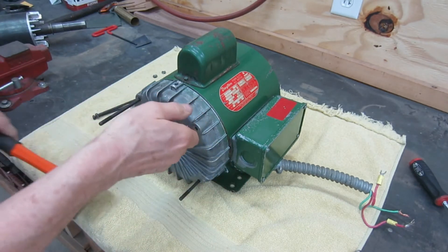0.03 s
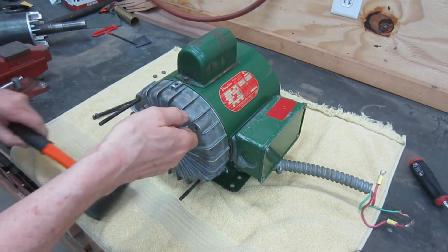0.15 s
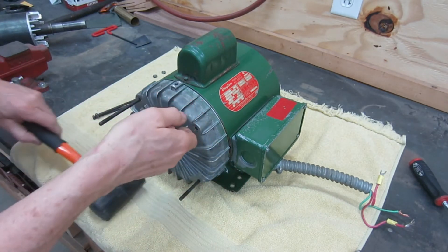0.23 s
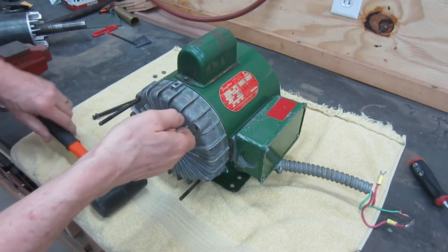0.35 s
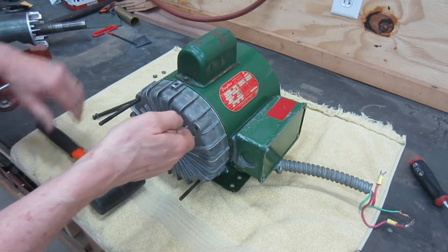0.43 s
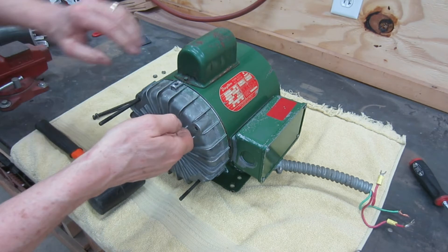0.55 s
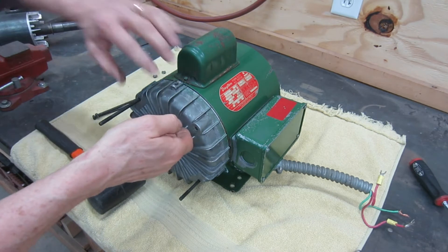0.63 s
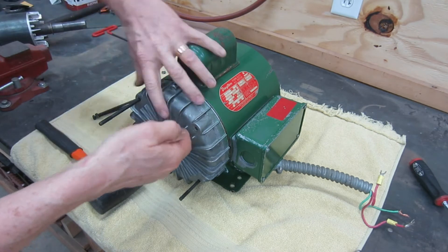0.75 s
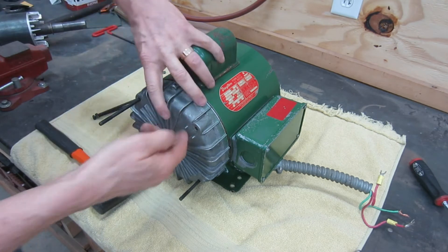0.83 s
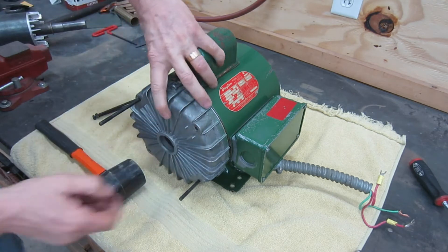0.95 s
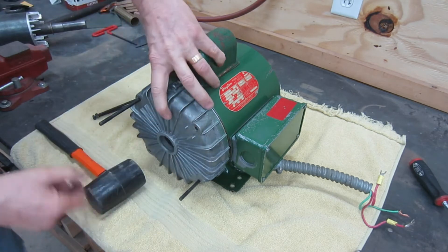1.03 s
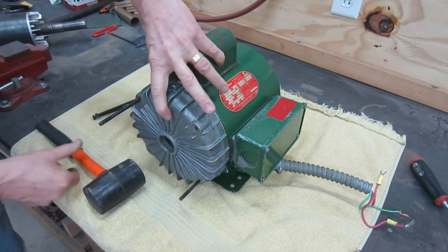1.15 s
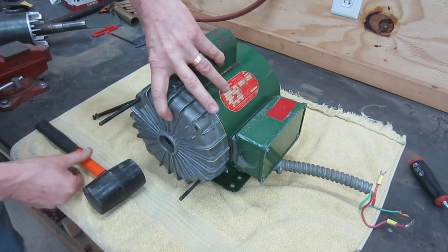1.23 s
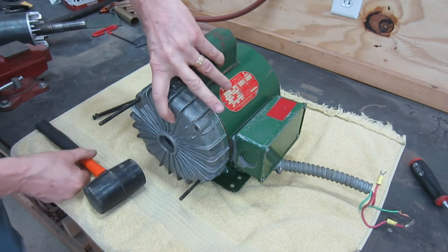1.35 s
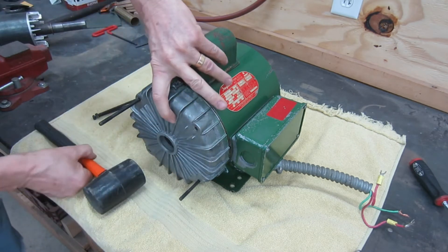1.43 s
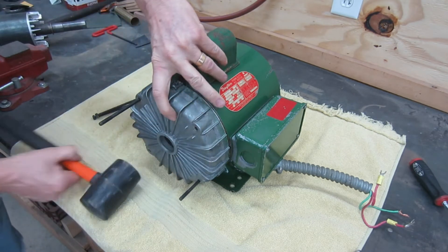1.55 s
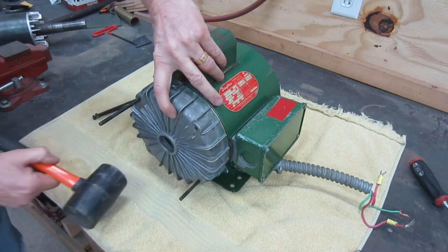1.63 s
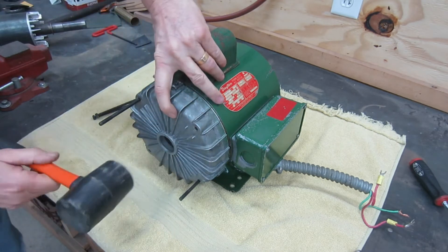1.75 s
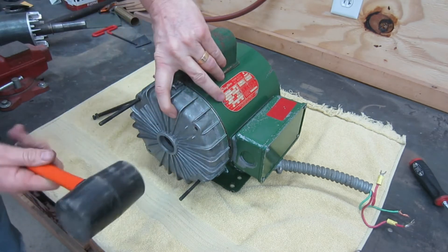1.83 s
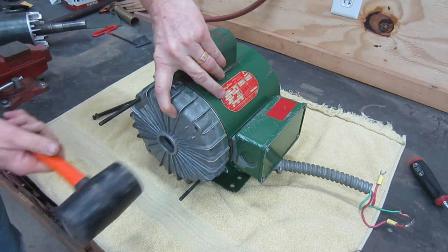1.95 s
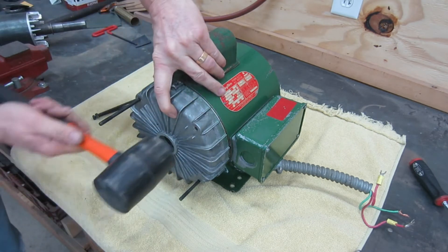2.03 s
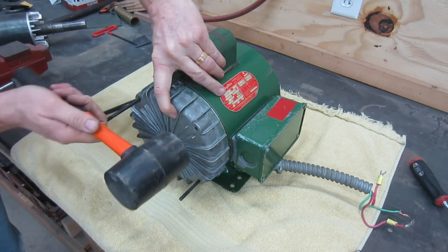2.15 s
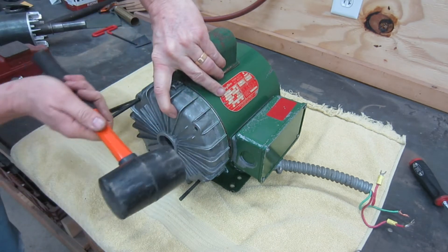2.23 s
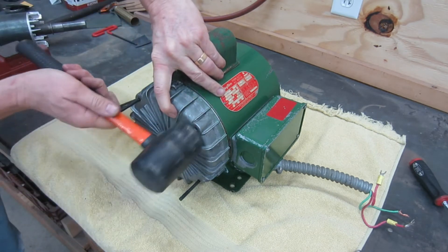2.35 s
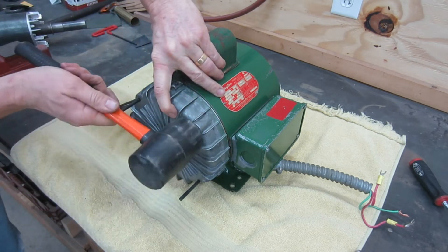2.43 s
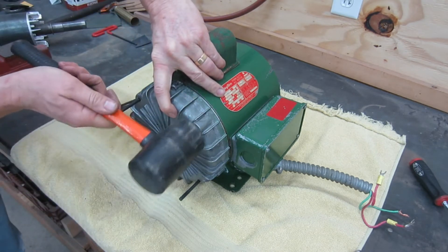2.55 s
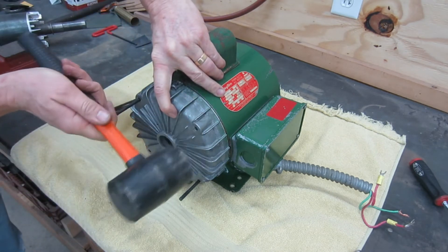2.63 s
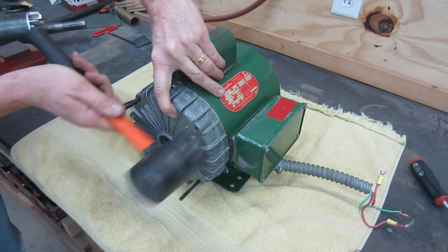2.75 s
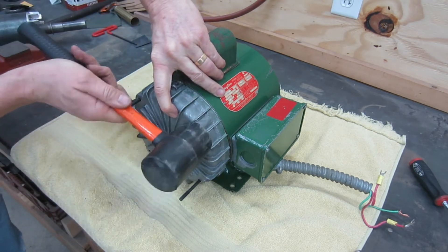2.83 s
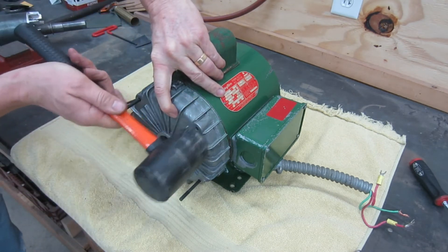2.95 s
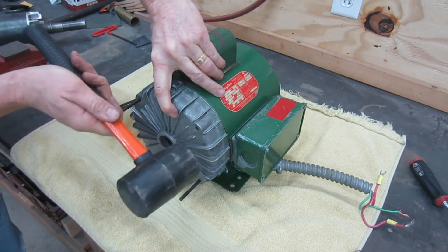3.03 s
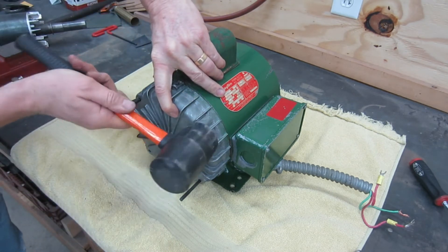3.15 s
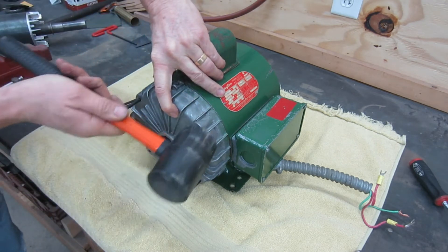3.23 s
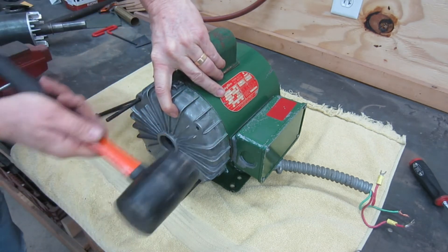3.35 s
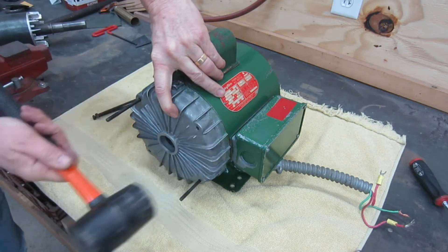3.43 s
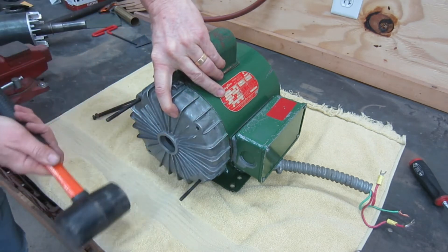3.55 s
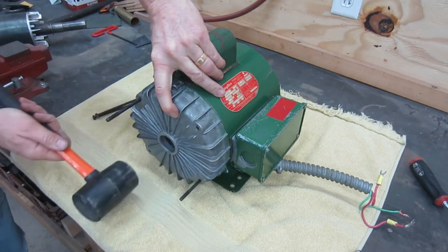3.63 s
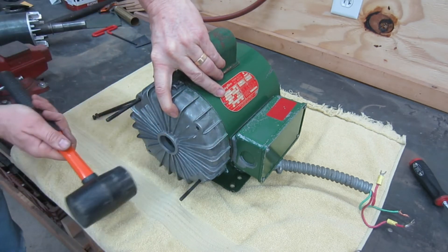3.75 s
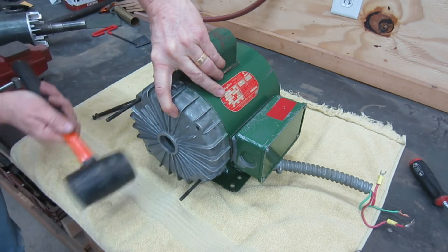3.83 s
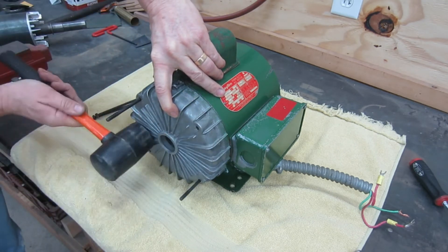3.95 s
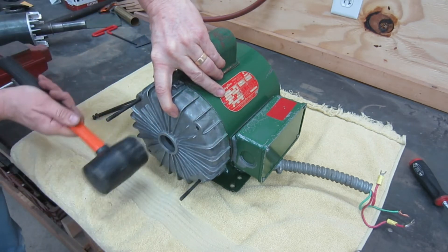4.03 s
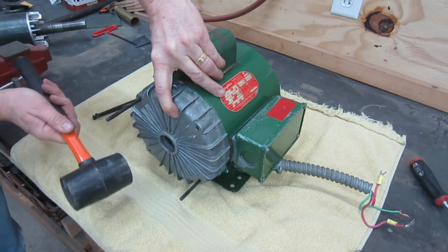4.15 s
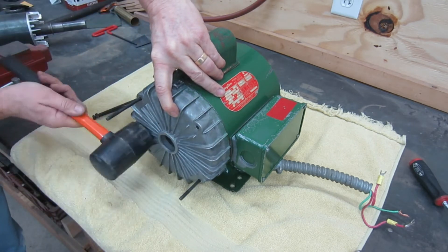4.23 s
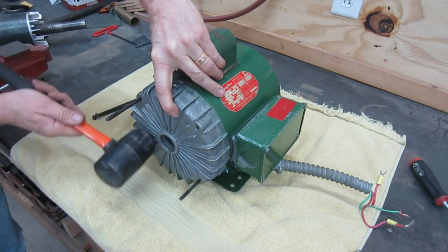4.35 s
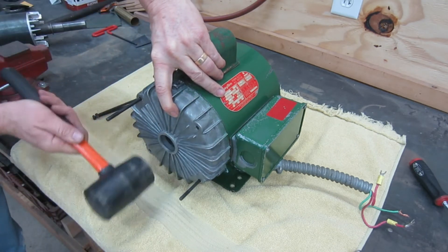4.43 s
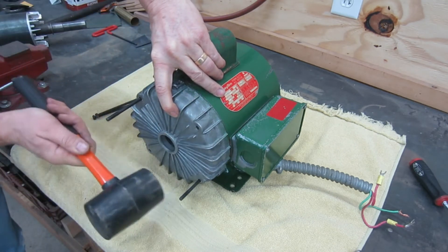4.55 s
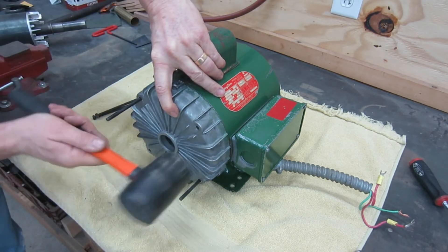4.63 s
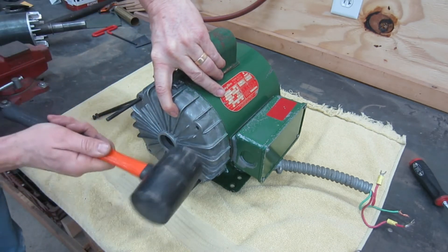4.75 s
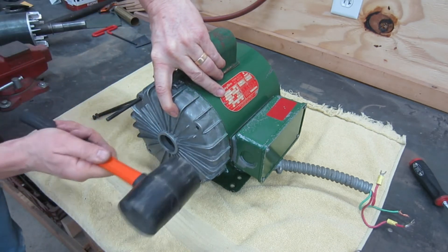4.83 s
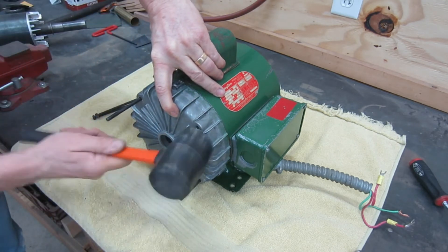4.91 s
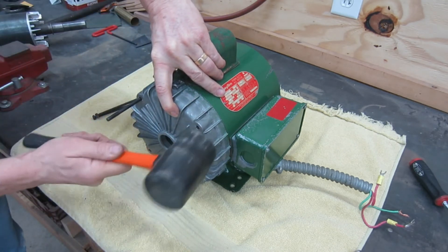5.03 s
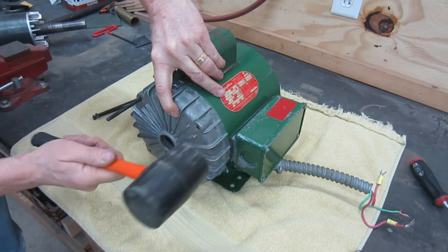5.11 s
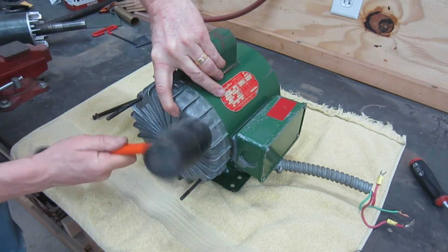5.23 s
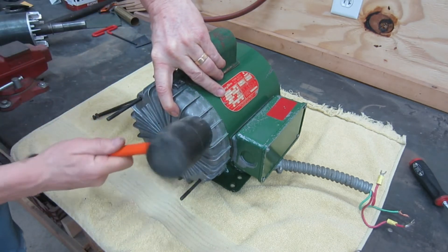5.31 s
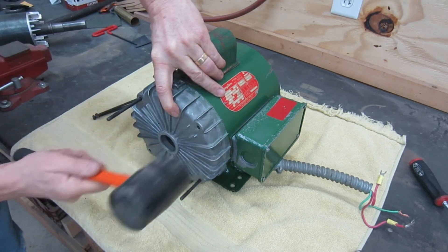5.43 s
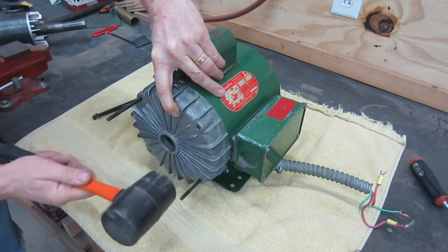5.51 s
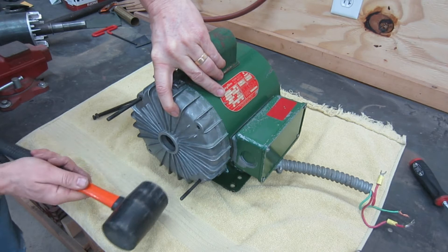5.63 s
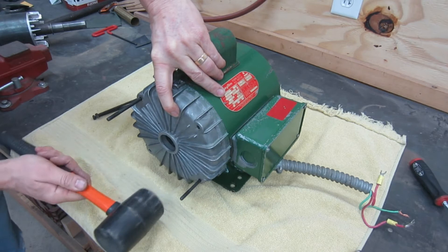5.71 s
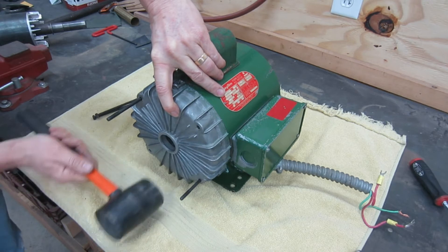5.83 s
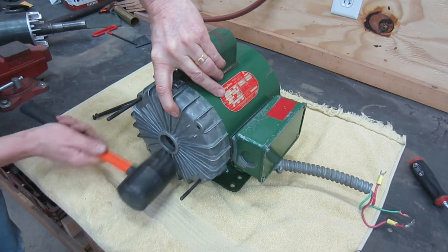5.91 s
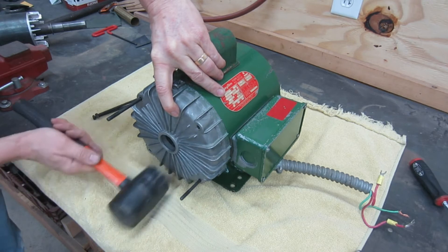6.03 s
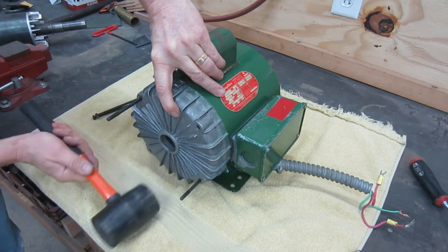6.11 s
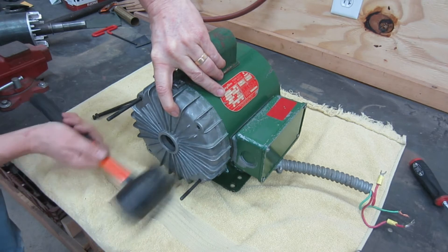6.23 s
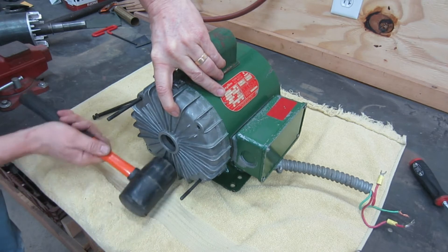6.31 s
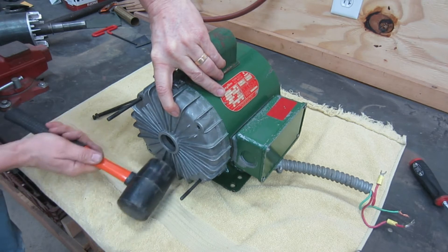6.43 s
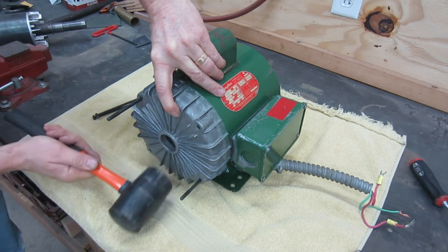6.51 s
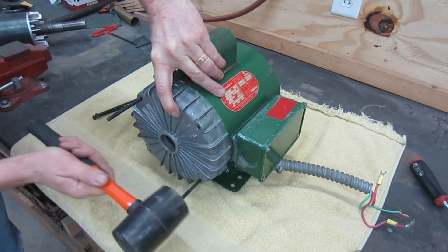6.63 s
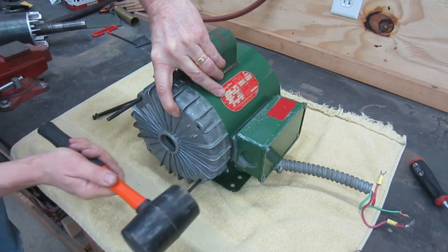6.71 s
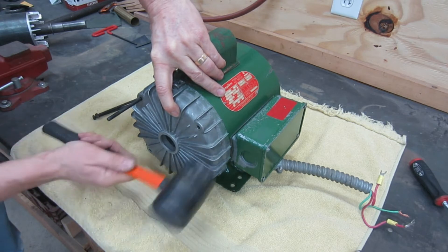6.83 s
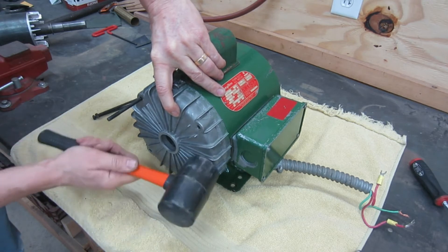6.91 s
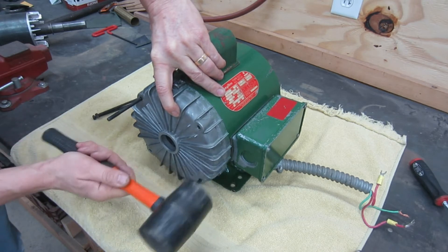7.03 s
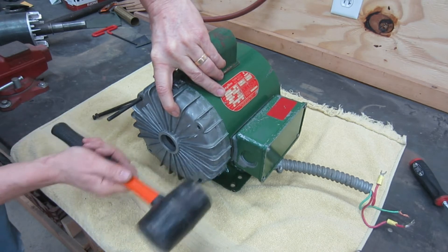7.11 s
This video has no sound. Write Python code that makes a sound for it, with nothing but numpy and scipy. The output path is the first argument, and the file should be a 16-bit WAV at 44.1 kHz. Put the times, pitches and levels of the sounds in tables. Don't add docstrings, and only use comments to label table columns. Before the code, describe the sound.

A rubber mallet is set down on a towel-covered bench with a firm woody knock, followed by light ticks and a soft hand rub on metal. Then eight strong, dull clanking blows hit a cast motor housing, mostly in pairs, with brief metallic tails and loose bolts chattering. A faint tap ends it. Close microphone, hard peaks overloading, lively workshop over faint hum.

```python
import sys
import numpy as np
from scipy import signal
from scipy.fft import rfft, irfft
from scipy.io import wavfile
from scipy.ndimage import uniform_filter1d

SR = 44100
rng = np.random.default_rng(int(sys.argv[2]) if len(sys.argv) > 2 else 0)


def invert_db(level):
    return 10 ** (np.asarray(level, dtype=float) / 20)


def wrap_up_sound(samples):
    columns = np.atleast_2d(samples).T
    tamed = np.clip(columns, -1, 1)
    steps = np.round(tamed * 32767).astype(np.int16)
    wavfile.write(sys.argv[1], SR, steps)


N = 316197

# start in seconds, spot hit, peak in dB, crack in dB, sheet cover in dB,
# rise time in ms.
BLOWS = [
    (2.7794, "under", 6.5, -23.5, -52.5, 1.3),
    (3.127, "right", 6, -16.5, -20, 0.56),
    (3.908, "left", 9, -26, -22.5, 0.1),
    (4.238, "left", 11, -27.5, -29, 0.35),
    (4.924, "top", 7.5, -24.5, -20.5, 1.8),
    (5.246, "top", 4, -14, -19.5, 0.55),
    (5.931, "foot", 1.5, -12, -37, .22),
    (6.276, "rim", -1.5, -21, -25.5, 0.32),
    (6.876, "edge", -19, -16.5, -43.5, .29),
]
SPOT_COLOURS = {"right": (-15, -16.5, -3.5, -26, -56), "left": (-17, -21.5, -14, -17, -69.5),
                "top": (-14.5, -18.5, -13.5, -19, -49.5), "foot": (-18, -12.5, -8, -13.5, -39.5),
                "rim": (-20.5, -10.5, -11, -6, -33), "under": (-17, -11, -6, -17, -67.5),
                "edge": (-13.5, -15.5, -4.5, -8, -25)}
JOLT_HZ = {"right": 352, "left": 380, "top": 388, "foot": 520, "rim": 544, "under": 363.3, "edge": 510}
# frequency in Hz, level in dB.
CASTING_MODES = [(250, -7.5), (325, 0.5), (430, 3), (560, -1), (680, 3.5), (790, -3), (890, 7.5), (1000, 1),
                 (1095, -3.5), (1320, 3), (1570, -5), (1800, -1.5), (2080, 4.5), (2270, 6.5), (2640, 8),
                 (3260, -12.5), (3950, -5.5), (4800, -9)]
# frequency in Hz, level in dB, t60 in seconds.
COVER_MODES = [(1351, 0, .4), (1362, -5, .3), (1343, -11, .6)]
# frequency in Hz, level in dB, t60 in seconds.
BOOM_MODES = [(70, -5, .2), (106, 0, .22)]
# start in seconds, frequency in Hz, level in dB, t60 in seconds.
SHOVES = [
    (2.784, 707, -6.5, 0.052),
    (2.782, 206.2, -9, 0.06),
    (3.127, 40, -18.5, .04),
]
ONSET_DELAY_S = .002


def blows():
    near, far = np.zeros(N), np.zeros(N)
    chance = rng.standard_normal((len(BLOWS), 3, SR // 5))
    cover = ring(*np.transpose(COVER_MODES), 0.83)
    swell_s = .015
    cover = cover * (1 - np.exp(-np.arange(len(cover)) / SR / swell_s))
    boom = ring(*np.transpose(BOOM_MODES), .5)
    frame = ring([328, 352], [0, -4], [.3, .2], 0.34)
    floor = signal.butter(4, 240, "high", fs=SR, output="sos")
    rattle_db, rattle_hz = 4, 25
    hold = int(SR / rattle_hz)
    bench_echo_s, echo_share = .0027, 0.28
    for (s, spot, db, crack_db, cover_db, rise_ms), c in zip(BLOWS, chance):
        *colour, boom_db = SPOT_COLOURS[spot]
        thud_db, arrival = db + colour[0], s + ONSET_DELAY_S
        front, side = strike(CASTING_MODES, (320, 700, 1150, 2400, 5000), colour + [crack_db], rise_ms, c)
        direct = invert_db(db - 1.5) * front
        add(near, arrival, direct)
        add(near, arrival + bench_echo_s, echo_share * direct)
        add(far, s, invert_db(db - 5.5) * side)

        jolt = signal.sosfilt(floor, ring([JOLT_HZ[spot]], [8.5], [.02], .1))
        add(near, arrival + rise_ms / 2000, invert_db(thud_db) * jolt)
        add(near, arrival, invert_db(thud_db - 14) * frame)

        wander = uniform_filter1d(np.repeat(c[1, -40:], hold), hold)[:len(cover)]
        rattling_cover = invert_db(cover_db + 1) * cover * invert_db(rattle_db * wander)
        for part, wall_share in ((rattling_cover, .15), (invert_db(db + boom_db) * boom, .6)):
            add(near, arrival, part)
            add(far, arrival, wall_share * part)
    for s, hz, db, t60 in SHOVES:
        add(near, s, ring([hz], [db], [t60], .2))
    return np.array([near, far])


# frequency in Hz, level in dB.
GRIT = [(300, -25.5), (1000, 4), (2500, 0), (5500, -8.5), (9000, -13), (11000, -27.5), (16000, -33)]


def strike(modes, centres_hz, colour_db, rise_ms, chance):
    hz, db = np.transpose(modes)
    level_change, detune = chance[:2, :len(hz)]
    db = db + np.interp(np.log(hz), np.log(centres_hz), colour_db) + 1.2 * level_change
    t60 = 13 / hz
    x = np.array([ring(hz * (1 + .012 * detune), db, t60, .2, order=k) for k in range(2)])
    t = np.arange(x.shape[1]) / SR
    x *= 1 - np.exp(-(t * 1000 / rise_ms) ** 2)

    grit = chance[2] * (np.exp(-t / 0.0041) + 0.33 * np.exp(-t / 0.0054))
    grit[0] += 9
    f = np.arange(1, len(t) // 2 + 2) / .2
    grit_hz, grit_db = np.transpose(GRIT)
    grit = irfft(rfft(grit) * invert_db(np.interp(np.log(f), np.log(grit_hz), grit_db)))
    delay = int(1.5 * rise_ms * SR / 1000) + 24
    x += invert_db(colour_db[-1] + 5) * np.roll(grit, delay) * (t < .1)

    below_lowest_mode = signal.butter(3, .72 * hz[0], "high", fs=SR, output="sos")
    front, side = signal.sosfilt(below_lowest_mode, x)
    return front, all_round(side)


def all_round(x):
    power = np.cumsum(np.abs(rfft(x)) ** 2)
    k = np.arange(1, len(power) + 1)
    low, high = k / 1.13, np.minimum(k * 1.13, len(power))
    even = (np.interp(high, k, power) - np.interp(low, k, power)) / (high - low + 1e-9)
    half = SR // 150
    return np.roll(irfft(np.sqrt(even)), half)[:2 * half] * np.hanning(2 * half)


def ring(hz, db, t60, seconds, order=0):
    t = np.arange(int(seconds * SR)) / SR
    hz, db, t60 = (np.reshape(v, (-1, 1)) for v in (hz, db, t60))
    modes = invert_db(db) * np.sin(2 * np.pi * hz * t) * np.exp(-np.log(1000) * t / t60)
    modes *= (-1) ** (order * np.arange(len(hz))[:, None])
    return np.sum(modes, axis=0) * (1 - np.exp(-t / .0004))


def add(out, s, x):
    i = int(s * SR)
    out[i:i + len(x)] += x[:len(out) - i]


# start in seconds, peak in dB, bench in dB, thud in dB, knock in dB.
THUDS = [
    (.226, -32, 1.5, -1.5, -60),
    (.24, -36, -4, -3, -13),
    (.33, -41, -4, -20, -30),
    (.449, -4.5, -19, -24.5, -1),
    (2.368, -28, -34, -2.5, 0.5),
]
# frequency in Hz, level in dB.
BENCH_MODES = [(105, -3.5), (170, 5), (250, 5), (370, 13), (490, -15), (650, 7), (810, -3.5), (990, -0.5),
               (1400, 1.5), (1900, 4), (2500, 5.5), (3300, 21)]


def thuds():
    near, far = np.zeros(N), np.zeros(N)
    chance = rng.standard_normal((len(THUDS), 3, SR // 5))
    boom = ring(*np.transpose(BOOM_MODES), .5)
    for (s, db, *colour), c in zip(THUDS, chance):
        crack_db = colour[-1] - 24
        front, side = strike(BENCH_MODES, (95, 320, 780, 3000), colour + [crack_db], 0.83, c)
        add(near, s + ONSET_DELAY_S, invert_db(db) * front)
        add(near, s + ONSET_DELAY_S, invert_db(db + colour[0] + 4) * boom)
        add(far, s, invert_db(db - 3.0) * side)
    return np.array([near, far])


# start in seconds, level in dB, lowest mode and second mode in dB relative to it.
CHATTER = [
    (2.19, -74, 9, 13),
    (2.406, -63.5, -7, -7),
    (2.80, -60.5, -29.5, 2.5),
    (3.918, -44.5, -3, 0),
    (4.258, -37, -4, -9),
    (4.938, -59.5, -2.5, 7),
    (5.267, -44.5, -13, -6),
    (5.95, -67.5, -8.5, 11),
    (6.299, -55.5, -18, 0),
]
# frequency in Hz, t60 in seconds.
BOLT_MODES = [(6331, .22), (8333, .22), (10600, .14), (13140, .13)]


def bolts():
    out = np.zeros(N)
    hz, t60 = np.transpose(BOLT_MODES)
    chance = rng.random((len(CHATTER), 16, 7))
    for (s, shake_db, *low_db), knocks in zip(CHATTER, chance):
        db = shake_db + np.array(low_db + [0, 0])
        length = max(.065 + .0015 * (shake_db + 40), .02)
        for when, size, detune, *spot in knocks:
            level_db = db - 9 * when - 8 * size - 8 * np.array(spot)
            knock = ring(hz * (1 + .014 * (detune - .5)), level_db - 1, t60, .35)
            add(out, s + 1.6 * length * when, knock)
    return out


# start in seconds, thing, click
# in dB, ring in dB.
TICKS = [(.312, "pin", -52, -65), (.545, "handle", -44.5, -45), (.772, "finger ring", -33, -36.5),
         (.781, "handle", -45.5, -41.5), (.859, "finger ring", -45.5, -41), (.862, "handle", -46.5, -45),
         (1.235, "handle", -50, -65), (1.363, "foot", -48, -51), (1.364, "pin", -48, -70),
         (1.61, "pin", -56, -64), (1.844, "pin", -51.5, -80), (2.176, "lug", -28.5, -40),
         (2.191, "pin", -43.5, -60.5), (2.195, "foot", -36, -47.5), (2.21, "rod", -55.5, -66),
         (2.26, "rib", -43.5, -47), (2.285, "fin", -52.5, -47), (2.311, "rod", -27.5, -39),
         (2.312, "pin", -61.5, -41), (2.369, "foot", -62, -35), (2.371, "lug", -61, -29),
         (2.407, "washer", -32.5, -52), (2.417, "finger ring", -44, -47.5), (2.424, "fin", -51.5, -51),
         (3.70, "spring", -71, -70), (3.935, "bar", -86, -55.5), (4.268, "rod", -78, -36.5)]
THINGS = {"finger ring": (2500, .045, 6000), "handle": (2150, .025, 5000), "foot": (1315, .06, 1300),
          "lug": (790, .03, 1300), "rod": (9280, .05, 3000), "pin": (6680, .022, 7000),
          "rib": (3830, .015, 5000), "washer": (3045, .5, 2500), "fin": (1850, .05, 3000),
          "spring": (6600, .3, 6600), "bar": (9380, .4, 9000)}


def ticks():
    out, t = np.zeros(N), np.arange(SR // 20) / SR
    for (s, thing, click_db, db), noise in zip(TICKS, rng.standard_normal((len(TICKS), len(t)))):
        hz, t60, grit_hz = THINGS[thing]
        edges_hz = [grit_hz / 2.6, min(grit_hz * 1.45, 15000)]
        band = signal.butter(2, edges_hz, "band", fs=SR, output="sos")
        add(out, s, invert_db(click_db) * signal.sosfilt(band, noise * np.exp(-t / 0.0047)))
        add(out, s, ring([hz, hz * 1.012, hz * 1.05], [db, db - 3, db - 7], [t60, t60, .02], .5))
    return out


# start, attack, hold and release in seconds, level in dB.
RUBS = [
    (.99, .06, .08, 0.096, -49.5),
    (2.16, 0.027, 0.18, 0.066, -55.5),
    (2.4, .01, .005, 0.03, -43),
]
# frequency in Hz, density in dB per Hz.
RUB_COLOUR = [(290, -15), (500, -17.5), (934, -8.5), (1550, -10), (2600, -7), (3720, -17.5), (8160, -23.5),
              (12000, -40), (15600, -72), (22000, -120)]


def rubbing():
    depth_db = 17
    gain = 0
    for s, up, hold, down, db in RUBS:
        full, release, end = s + up, s + up + hold, s + up + hold + down
        gain = gain + curve([(s, db - depth_db), (full, db), (release, db), (end, db - depth_db)])
    return gain * coloured(RUB_COLOUR)


def curve(rows):
    s, db = np.transpose(rows)
    return invert_db(np.interp(np.arange(N) / SR, s, db, left=-150, right=-150))


def coloured(points):
    hz, db = np.transpose(points)
    f = np.arange(1, N // 2 + 2) * SR / N
    shape = invert_db(np.interp(np.log(f), np.log(hz), db))
    noise = irfft(rfft(rng.standard_normal(N)) * shape, N)
    return noise / np.sqrt(np.mean(noise ** 2))


# band centre in Hz, t60 in seconds, level in dB.
WALLS = [(88, 0.5, 13.5), (182, 0.73, 4), (389, 0.61, 11), (670, 0.65, 8), (1460, 0.72, 6.5),
         (2290, 0.67, 4.5), (6050, 0.52, 6), (8700, 0.091, 14), (13700, 0.089, 11.5)]


def walls():
    t, out = np.arange(SR) / SR, 0
    for hz, t60, db in WALLS:
        band = signal.butter(2, [hz / 1.405, min(hz * 1.41, 21000)], "band", fs=SR, output="sos")
        decay = np.exp(-np.log(1000) * t / t60)
        out = out + invert_db(db) * signal.sosfilt(band, rng.standard_normal(SR)) * decay
    first_echo_s, swell_s = 0.0013, 0.0027
    out = out * np.clip((t - first_echo_s) / swell_s, 0, 1)
    return invert_db(-2) * out / np.sqrt(np.sum(out ** 2))


# frequency in Hz, density in dB per Hz.
SHOP_COLOUR = [(20, -21), (40, -7), (65, -3.5), (130, -7.5), (285, -10.5), (476, -10.5), (936, -15.5),
               (1890, -18), (2900, -25), (4140, -30.5), (6740, -30), (9320, -35), (11300, -50.5),
               (16000, -43)]
# time in seconds, level in dB.
SHOP_LEVEL = [(0, -56), (2.7, -57), (3.8, -60), (4.85, -60), (5.9, -64), (6.8, -64), (7.17, -61)]
# frequency in Hz, level in dB.
WHINES = [(12910, -95.5), (15730, -89.5)]


def shop():
    t = np.arange(N) / SR
    whine = sum(invert_db(db) * np.sin(2 * np.pi * hz * t) for hz, db in WHINES)
    return curve(SHOP_LEVEL) * coloured(SHOP_COLOUR) + whine


def scene():
    friction = rubbing()
    tick_shares = np.array([[1], [.6]])
    near, far = thuds() + blows() + bolts() + friction + ticks() * tick_shares
    echo = signal.fftconvolve(far, walls())[:N]
    return (near + echo + shop())[None]


def roll_off(x):
    return signal.sosfilt(signal.butter(12, 16510, fs=SR, output="sos"), x)


def record(dry):
    soft = signal.sosfilt(signal.butter(1, 11000, fs=SR, output="sos"), dry)
    return roll_off(np.clip(soft, -.99, .99))


dry = scene()
out = record(dry)
wrap_up_sound(out)
```